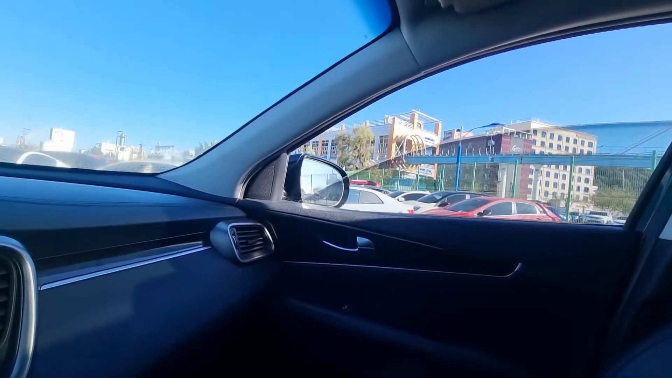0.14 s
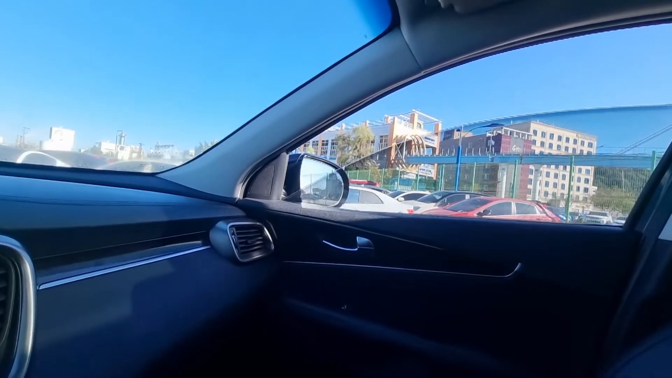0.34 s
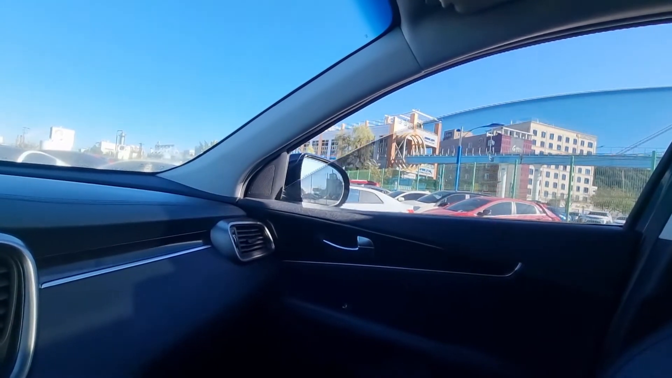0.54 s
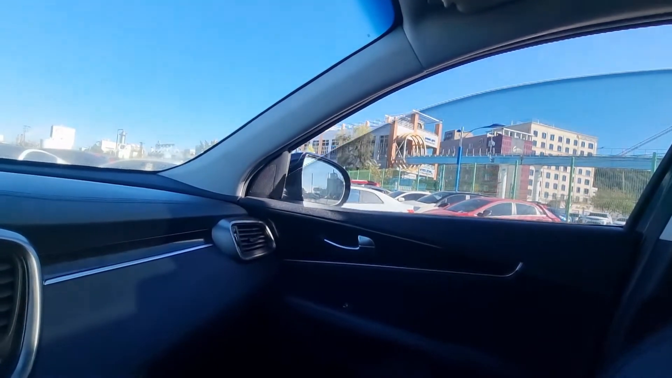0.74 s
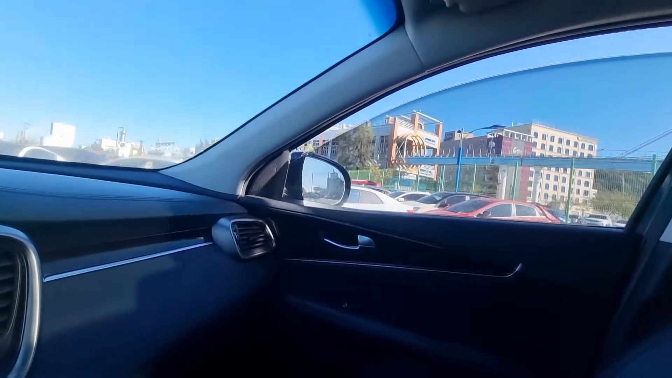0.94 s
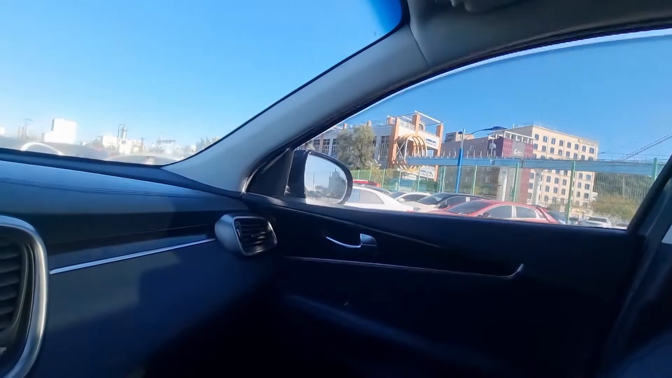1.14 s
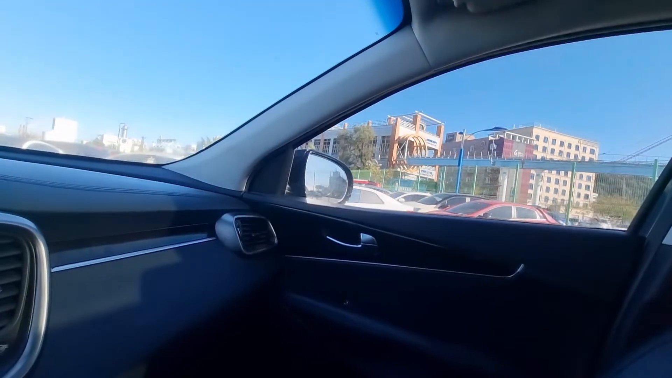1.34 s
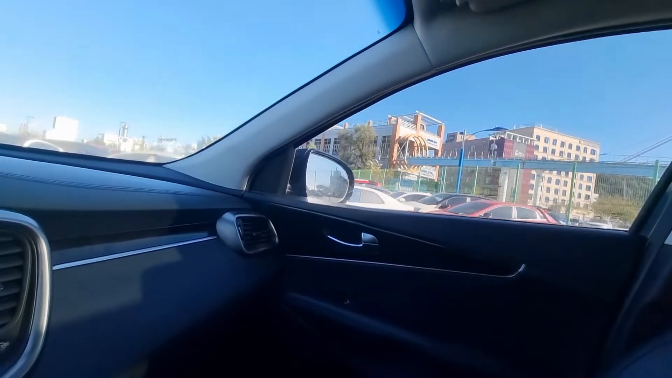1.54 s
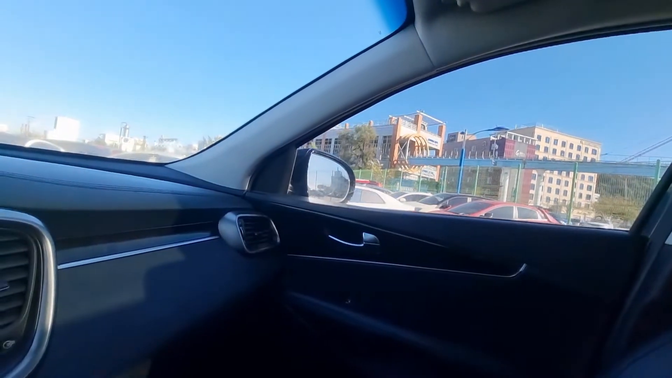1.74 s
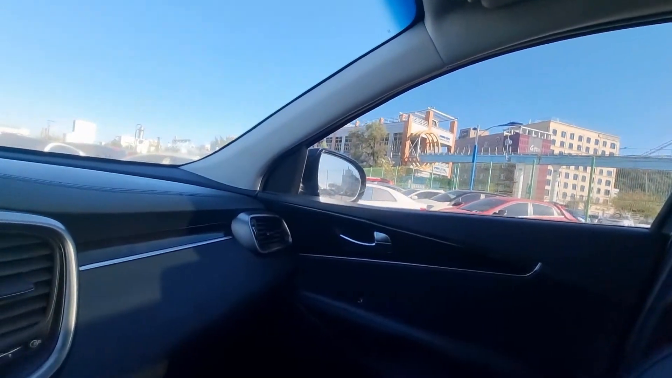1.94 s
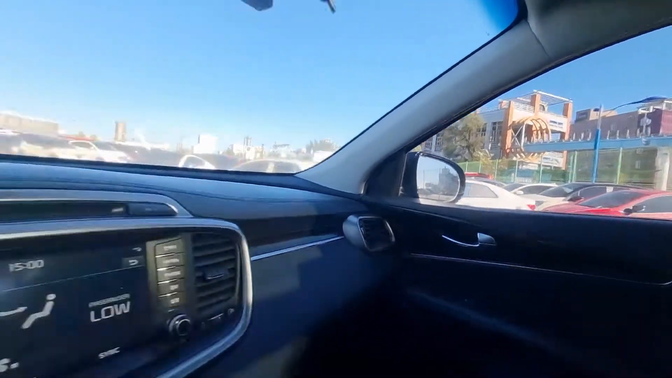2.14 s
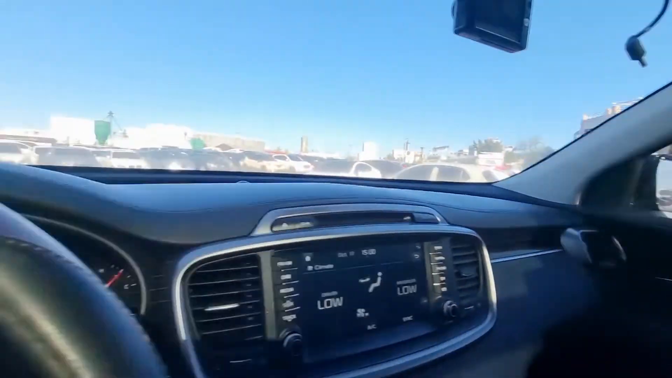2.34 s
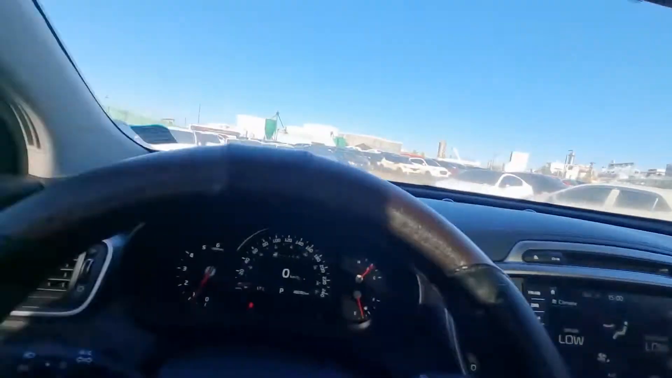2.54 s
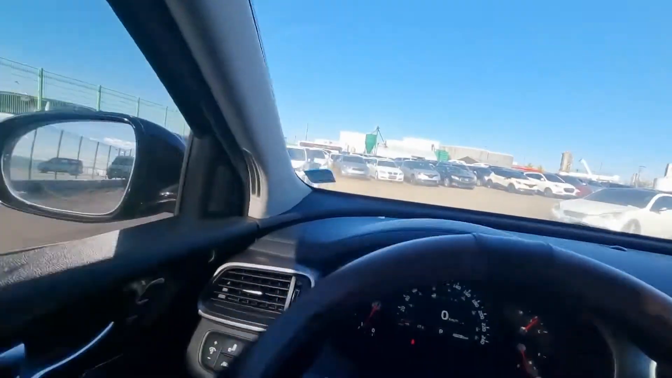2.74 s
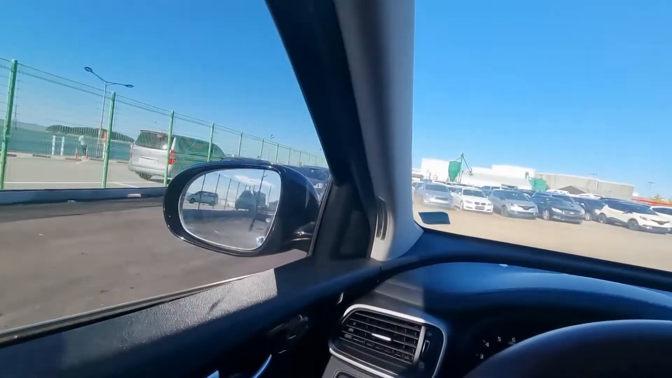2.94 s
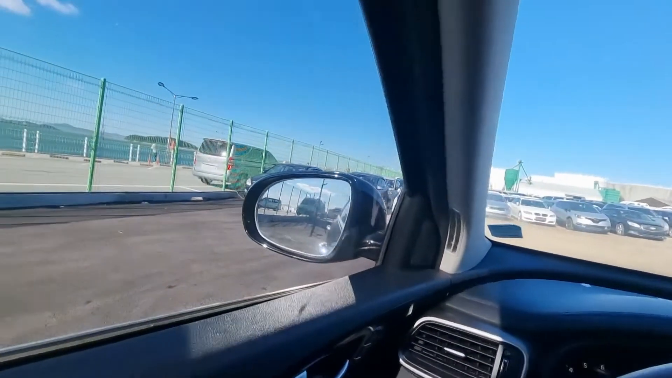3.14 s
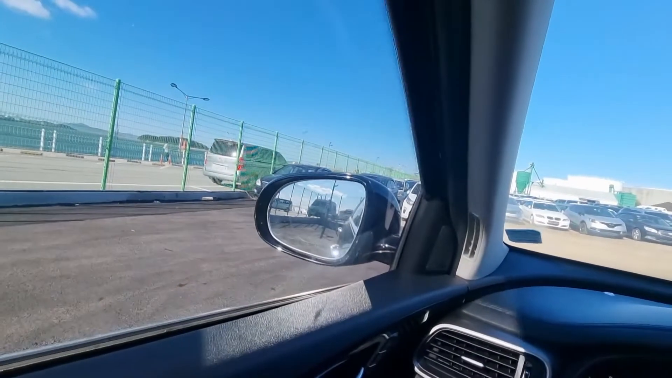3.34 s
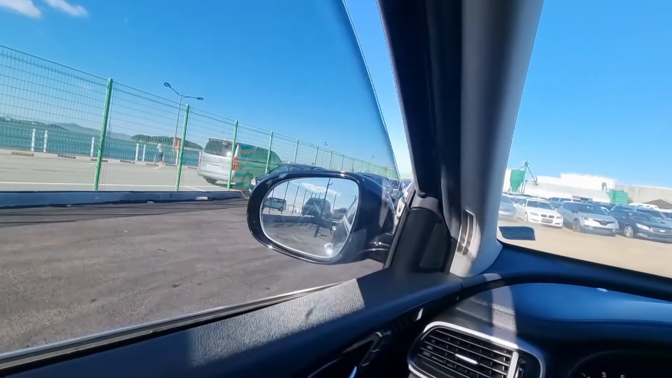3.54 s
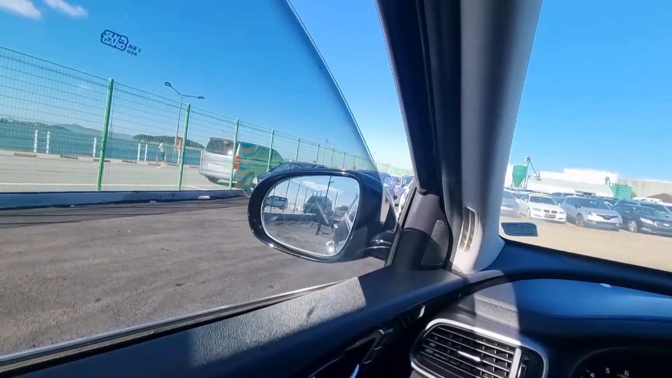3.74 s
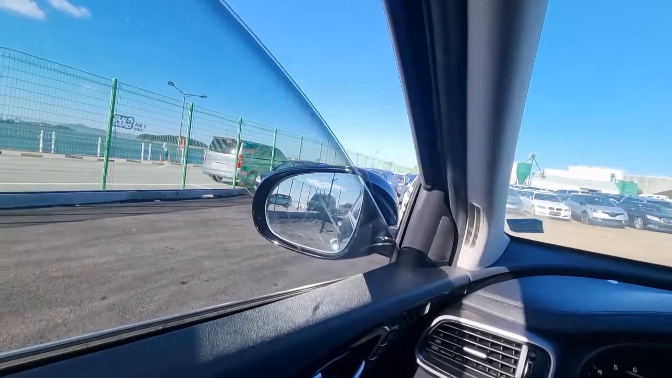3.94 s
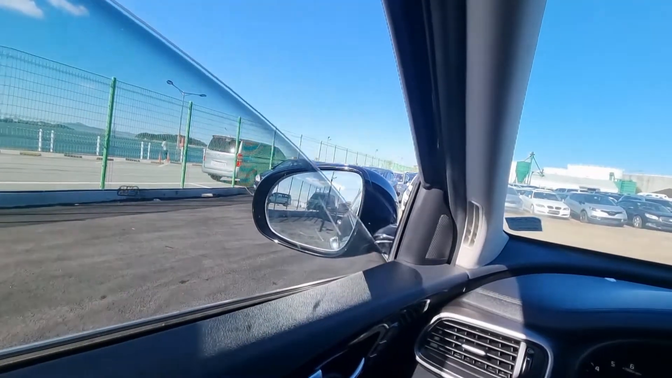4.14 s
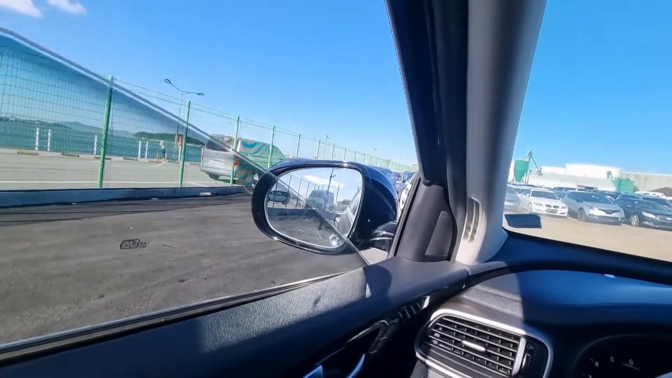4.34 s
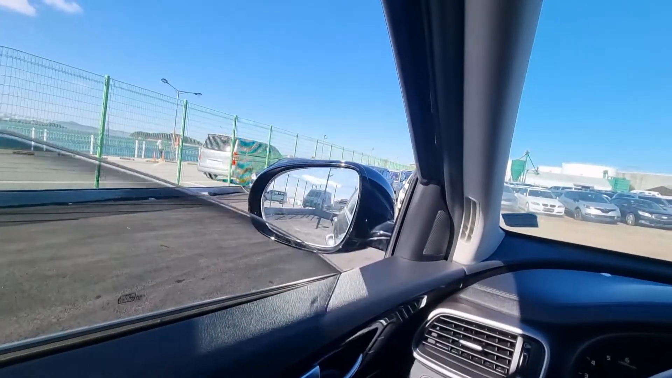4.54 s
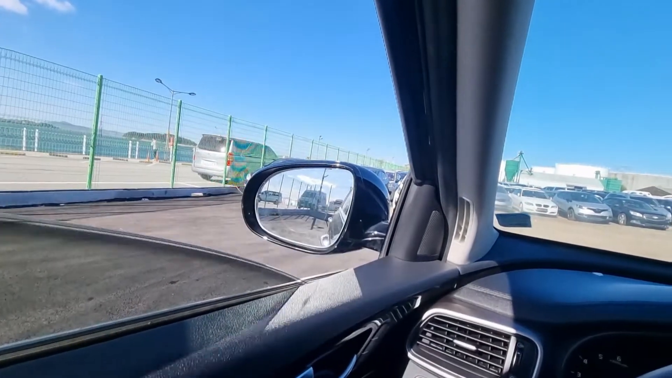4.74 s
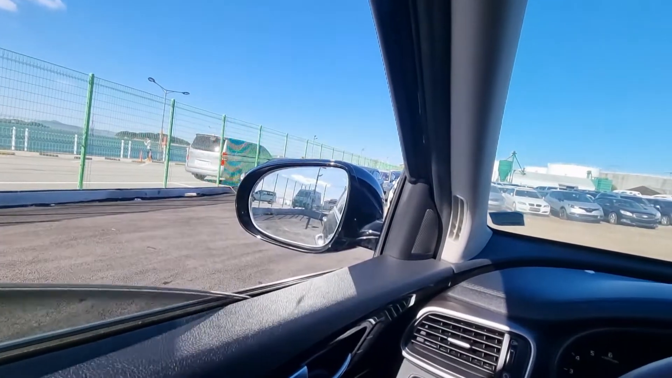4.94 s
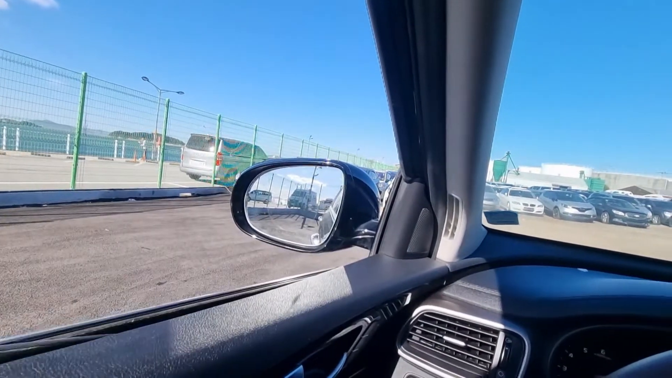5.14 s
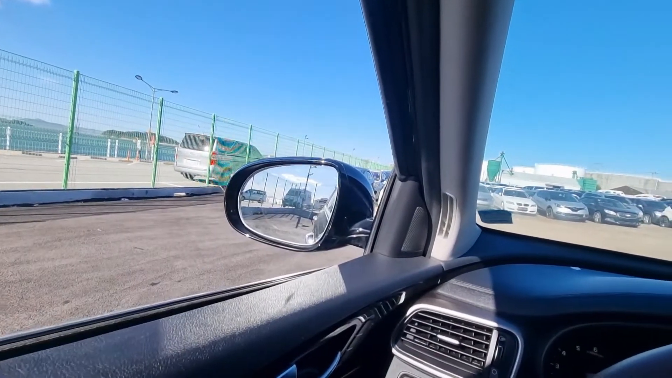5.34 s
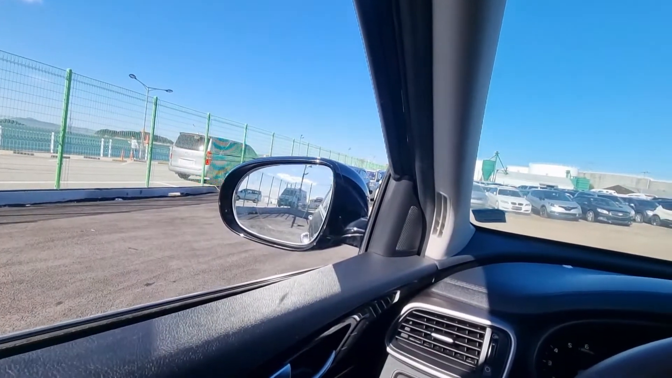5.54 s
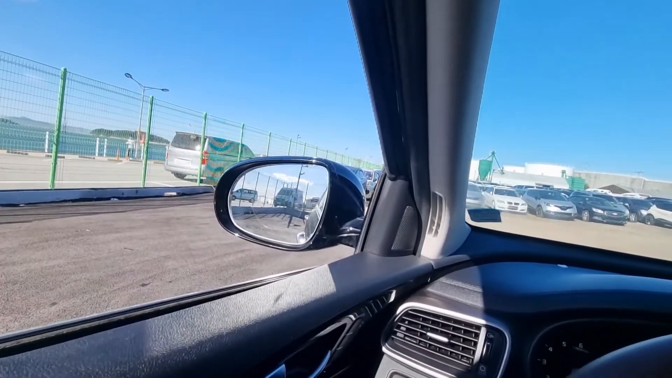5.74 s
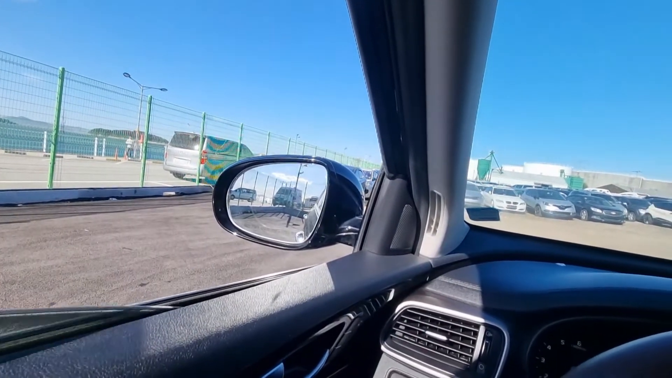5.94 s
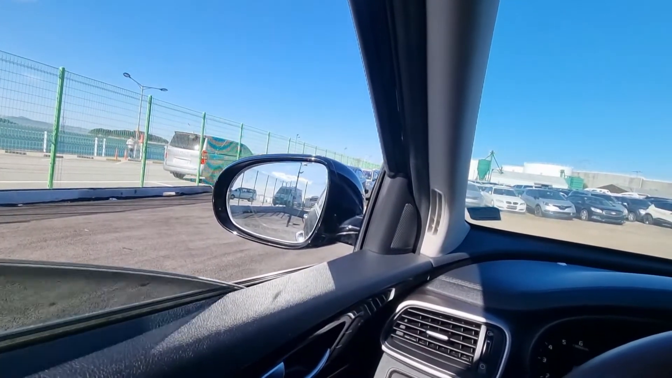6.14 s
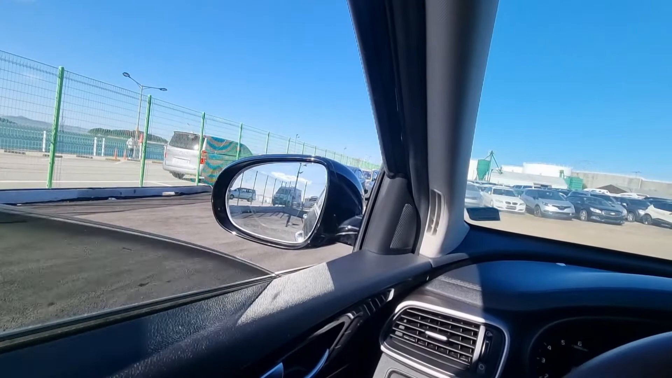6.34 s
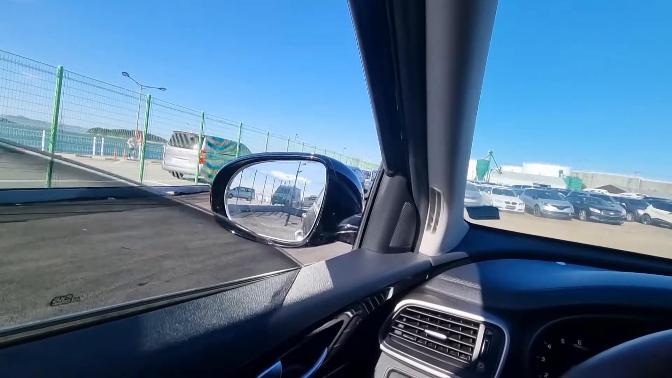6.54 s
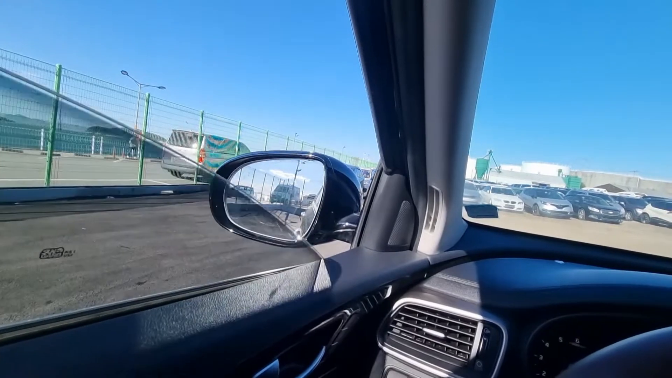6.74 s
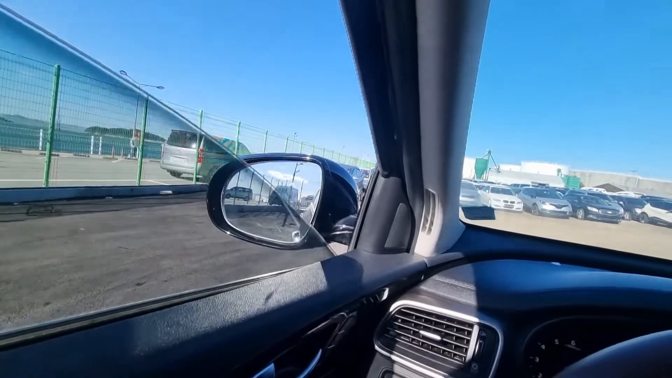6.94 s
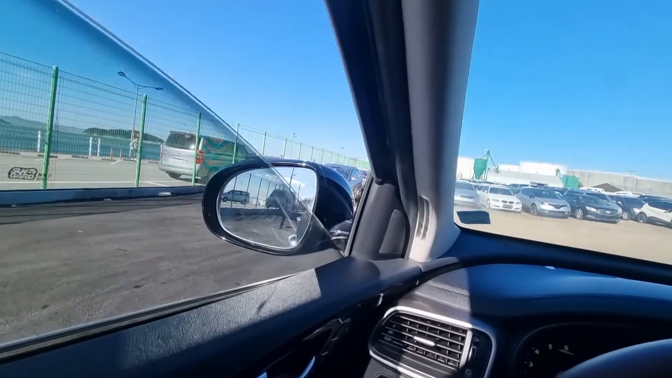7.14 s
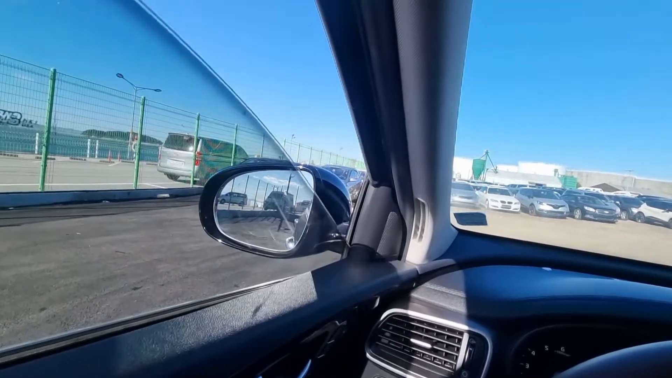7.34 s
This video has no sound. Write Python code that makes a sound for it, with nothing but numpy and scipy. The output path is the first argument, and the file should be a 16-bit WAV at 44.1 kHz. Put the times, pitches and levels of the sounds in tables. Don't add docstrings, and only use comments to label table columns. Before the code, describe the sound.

Inside a parked car, the engine idles with a low, fast throb beneath soft body rumble and steady blower air. At 0.2 s a switch clicks with a light knock, and the far window motor hums faintly while glass brushes its felt. Around 1.35 s the rubbing thickens and the motor strains; at 1.5 s it ends in a deep, dull thud. Small dry clicks come near 1.75-1.85 s and 2.05 s. From 2 to 3.2 s the microphone swings past a soft airy vent, with slight bumps and growing rumble. At 3.27-3.37 s the near glass tears free in a loud clattering clunk, then runs down with a close, higher whir, hiss and faint squeaks. It stops softly around 5.45 s. Thumps and a clicking take-up at 5.5-5.7 s start the upward run, lower and steady, with a dry snap at 6.17 s, continuing to the end at 7.4 s.

```python
import sys
import numpy as np
from scipy import signal
from scipy.fft import rfft, irfft, next_fast_len
from scipy.io import wavfile

SR = 44100
rng = np.random.default_rng(int(sys.argv[2]) if len(sys.argv) > 2 else 0)


def rack_gain(trim_db):
    fader = np.asarray(trim_db, float)
    return 10 ** (fader / 20)


def master(y):
    cut = np.clip(np.atleast_2d(y).T, -1, 1)
    pcm = np.round(cut * 32767)
    wavfile.write(sys.argv[1], SR, pcm.astype(np.int16))


N = 325458
SIZE = next_fast_len(N + 64)
HZ = np.arange(SIZE // 2 + 1) * SR / SIZE + 1e-3
PORT_LAG_S = 0.00043

# (time [s], shaft rate [Hz], shaft hum [dB], order 2 level [dB], commutator whine [dB])
FAR_MOTOR_UP = [
    (0.27, 95.7, -58, -78, -59.5),
    (0.86, 97.93, -51, -73, -63.5),
    (1.36, 97.4, -51, -61, -59.5),
    (1.47, 92.6, -36.5, -53, -58),
]
NEAR_MOTOR_DOWN = [(3.42, 114.8, -38, -50, -62), (3.5, 116.7, -33.5, -53, -62),
                   (3.65, 118.7, -33.5, -51.5, -60.5), (3.83, 119.4, -35, -50.5, -63),
                   (4.0, 119, -57, -56, -64), (4.27, 119, -47.5, -46.5, -69), (4.6, 117.5, -51, -56, -65.5),
                   (4.72, 120, -48.5, -55.5, -58), (4.83, 117.3, -48.5, -54, -60),
                   (4.93, 120.5, -52, -51.5, -58), (5.05, 120.6, -46, -49, -72),
                   (5.17, 122.3, -51, -52.5, -65), (5.3, 124.3, -57, -56, -62),
                   (5.44, 124.3, -51, -63, -63)]
NEAR_MOTOR_UP = [(5.72, 93.18, -44, -54, -65), (5.85, 95.1, -46, -58.5, -72), (6.3, 94.34, -51, -68, -63.5),
                 (6.6, 93.25, -39, -55, -64), (6.9, 91.76, -56, -58, -61), (7.22, 91.1, -41.5, -55, -56.5),
                 (7.38, 91.6, -38, -57, -62)]
# (multiple of shaft rate, level re order 3 [dB])
GEAR_ORDERS = [(4, -11), (5, -2.5), (6, -5), (7, -5)]
# (multiple of shaft rate, level [dB])
BRUSH_ORDERS = [(16, -65), (22, -65), (24, -76), (27, -67), (32, -68)]

# (time [s], level [dB], dullness [1]: less felt touched, or facing away)
FAR_SLIDE = [(0.23, -56, 0.48), (0.274, -55, 0.56), (0.89, -55, 0.26), (1.32, -55, 0.11)]
FAR_SEAL = [(1.34, -49.5, 0.05), (1.39, -46.5, 0.1), (1.43, -52.5, -0.26), (1.49, -46.5, 0.1),
            (1.52, -60, 0.4), (1.54, -55.5, .5), (1.555, -75, 0.6)]
NEAR_SLIDE_DOWN = [(3.285, -59, 0.5), (3.312, -64, 0.99), (3.336, -46.5, 0.064), (3.446, -42, 0.073),
                   (3.53, -48.5, 0.0), (4.2, -51.5, 0.029), (4.68, -51, 0.12), (4.98, -53.5, 0.11),
                   (5.41, -56, 0.52), (5.45, -52.5, 1.5), (5.475, -66, 1.5), (5.52, -65, 1.4),
                   (5.62, -67, 1.2)]
NEAR_SLIDE_UP = [(5.65, -54, 2.5), (5.68, -48.5, 2.8), (5.72, -49.5, 1.3), (5.81, -56, 0.56),
                 (5.95, -53.5, 0.65), (6.22, -52, 0.4), (6.54, -52.5, 0.26), (6.74, -52, 0.2),
                 (7.38, -53.5, 0.16)]
VENT = [(2.03, -71, 3), (2.3, -67, 0.9), (2.45, -61.5, 1), (2.55, -63, 0.55), (2.7, -59.5, 0.4),
        (2.9, -58.5, 0.5), (3.08, -60.5, 0.0), (3.27, -58.5, 0)]
# (frequency [Hz], level per Hz [dB])
FAR_FELT = [(760, 8), (1300, -5), (1580, -2.5), (1800, -9), (1930, -4.5), (3190, -2), (3690, -4.5),
            (4400, -6.5), (5040, -9), (6960, -5.5), (10000, -23), (13600, -18), (15700, -15.5)]
NEAR_FELT = [(760, -2), (1300, 7), (1570, 0.5), (1720, 1), (2080, 0.5), (2640, 5), (3690, 0.5), (4270, -6),
             (5650, -12), (6750, -9), (8310, -13), (9820, -22.5), (10700, -18), (13300, -6), (15700, -3.5)]
VENT_AIR = [(760, -5), (1300, 0.5), (1490, -2), (1650, -1.5), (2210, -4.5), (2930, -5), (4360, -11.5),
            (7110, -6), (9720, -29.5), (13700, -24), (15700, -19.5)]

# (time [s], peak [dB], pitch factor [1], upper mode hardness [dB], share of free ring time [1])
THUDS = [(0.236, -26.5, 0.77, -4.5, 0.61), (1.4927, -12, 0.922, -9, 0.47), (1.502, -18, 0.954, -1.5, 0.56),
         (1.511, -21, 1.24, -10, 0.39), (1.525, -22.5, 0.83, -8, 0.55), (1.537, -23.5, 1.08, -21, 0.89),
         (1.829, -38, 0.9, 9, 0.94), (2.441, -32.5, 1.01, 0.5, 1), (2.999, -31, 0.794, -5, 0.74),
         (3.278, -15.5, 0.95, 1, 0.67), (3.286, -13.5, 0.89, -10, 0.28), (3.299, -12, 1.19, -8, 0.34),
         (3.317, -14.5, 0.804, -6, 0.48), (3.3273, -5.5, 0.97, 1, 0.58), (3.346, -19, 1.01, -12, 0.5),
         (3.373, -20, 0.94, -3.5, 0.59), (5.432, -28, 1.125, 1, 0.55), (5.499, -25.5, 0.604, -10, 0.36),
         (5.579, -28.5, 0.69, -12, 1), (5.638, -32, 1.17, 13, 0.33), (5.661, -26.5, 1.3, 4, 0.32),
         (5.684, -32.5, 0.86, 5, 0.42)]
# (frequency [Hz], level [dB], decay time t60 [s])
DOOR_MODES = [(64.9, 3.5, 0.19), (83.5, 2, 0.19), (122.2, 0, 0.14), (150.5, -4, 0.097), (257, -8.5, 0.11),
              (328, -10, 0.12), (362, -13, 0.047), (573, -21.5, 0.27)]
# (time [s], peak [dB], top frequency [Hz], decay time t60 [s])
STRIKES = [(1.493, -32, 1480, 0.029), (1.503, -34, 2510, 0.06), (1.739, -50, 1500, 0.023),
           (1.812, -49, 1490, .04), (1.8255, -39.5, 1800, .05), (1.8475, -35.5, 4030, 0.021),
           (1.8478, -38, 10000, .03), (2.04, -58, 4760, 0.065), (3.2755, -20, 2500, 0.025),
           (3.281, -25, 3500, 0.019), (3.295, -20.5, 3440, 0.026), (3.315, -27.5, 7500, 0.063),
           (3.322, -22, 9000, 0.029), (3.3266, -16, 3030, 0.048), (3.332, -20, 2500, 0.044),
           (3.306, -43, 7000, .06), (5.303, -39, 4000, 0.027), (5.429, -47, 3430, 0.071),
           (5.509, -48, 3496, 0.035), (5.637, -29, 3800, 0.033), (5.645, -30, 1200, 0.035),
           (5.699, -36, 8000, 0.025), (5.661, -46, 3480, .05), (6.1675, -33, 6500, .025),
           (3.265, -34, 3000, 0.064), (3.302, -35, 3500, 0.045), (3.354, -30, 7000, 0.076),
           (3.362, -29.5, 4000, .05)]

# (time [s], ring [dB], ring frequency [Hz], crunch [dB], crack [dB])
TICKS = [(.223, -31, 1075, -74, -50.5), (.228, -42, 1780, -88, -65), (1.346, -49, 1120, -49, -55),
         (1.379, -40, 1190, -58, -48), (1.49, -33, 487, -46, -53), (1.497, -45, 1420, -42.5, -48),
         (1.824, -55, 4400, -53, -82), (2.443, -49, 1090, -67, -68), (3.262, -40, 700, -52, -62),
         (3.279, -28, 650, -50, -55), (3.292, -32.5, 1210, -36, -65), (3.353, -36.5, 3000, -43, -35),
         (3.66, -34, 1300, -43, -41), (3.661, -46, 870, -60, -60), (5.303, -52, 1110, -51, -56),
         (5.427, -42, 1377, -59, -55.5), (3.315, -29, 600, -44, -32)]
# (time [s], ring [dB], ring frequency [Hz], crunch [dB], crack [dB])
TAKE_UP = [(5.634, -34, 2600, -64, -70), (5.635, -39, 3360, -61, -60), (5.637, -34, 436, -50, -52),
           (5.641, -46, 1410, -46, -60), (5.668, -36, 834, -58, -69), (5.674, -43, 2240, -62, -60),
           (5.672, -41, 320, -60, -68), (5.664, -44, 1300, -62, -70), (5.652, -47, 2500, -62, -66),
           (5.698, -48, 2350, -60, -66), (5.697, -46.5, 4260, -46, -56)]
# (time [s], ring [dB], ring frequency [Hz], crunch [dB], crack [dB])
SNAPS = [(1.739, -54, 940, -68, -83), (1.848, -44, 7340, -52, -45), (2.04, -45, 1150, -64, -79),
         (1.826, -42, 1100, -60, -80), (3.3225, -34, 5750, -44, -24), (6.1675, -54, 5200, -50, -43),
         (1.837, -56, 7500, -75, -70)]
# (time [s], ring [dB], crunch [dB], crack [dB], gap between touches [s])
CLUNKS = [
    (3.2755, -26, -31.5, -43.5, .003),
    (3.3258, -24.5, -47, -56.5, 0.0013),
]
# (frequency [Hz], level [dB])
LINKAGE = [(850, -0.5), (1490, -0.5), (660, -1.5), (1270, -2.5), (1820, -3)]

# (time [s], length [s], start frequency [Hz], end frequency [Hz], level [dB])
PANE_STREAKS = [(0.3, 0.68, 2980, 3170, -56), (.85, 0.44, 3200, 3430, -65), (2.95, 0.48, 2080, 2240, -60),
                (3.05, .2, 7900, 7850, -62), (3.4, 0.37, 2770, 2980, -47), (3.95, 0.26, 2450, 2700, -56),
                (4.3, 0.32, 2800, 2850, -65), (4.55, 0.19, 2600, 2610, -50), (4.15, .3, 6900, 6900, -57),
                (4.95, 0.301, 6700, 6850, -56), (5.75, 0.35, 2460, 2520, -64), (6.35, 0.6, 2596, 2700, -53),
                (6.5, 0.42, 2830, 2830, -49), (6.25, 0.74, 7030, 6700, -46), (6.55, 0.36, 6300, 6400, -50)]
# (time [s], length [s], start frequency [Hz], end
# frequency [Hz], level [dB])
WHINES_AND_RINGS = [(1, 0.91, 685, 620, -57), (0.44, 0.99, 1200, 1200, -65), (.25, .7, 485, 492, -60),
                    (1.5, 1.1, 490, 500, -61), (3.9, .12, 3110, 3210, -53), (4.05, .2, 3600, 3210, -54),
                    (3.6, .13, 2360, 2460, -53), (3.68, .27, 2890, 2860, -54), (4.22, .28, 2830, 2600, -56),
                    (3.5, .15, 2780, 3100, -52), (6.15, .15, 2500, 2580, -56), (6.5, 0.34, 2930, 2880, -57),
                    (7.05, .2, 2880, 3050, -59), (5.659, .024, 845, 870, -33), (5.635, .014, 2600, 2640, -34),
                    (3.276, .018, 650, 640, -24), (3.274, .012, 900, 880, -25)]
# (time [s], length [s], start frequency [Hz], end frequency [Hz], level [dB])
SEAL_SQUEAKS = [(2.94, .03, 13200, 15700, -74), (3.02, .065, 14000, 15300, -70),
                (3.13, .08, 15000, 15200, -78), (3.05, 0.078, 13650, 13700, -70),
                (3.162, 0.056, 13600, 13500, -71), (3.23, .08, 13600, 13800, -67)]

# (level facing far door [dB], level facing near door [dB], gain with window open [dB])
IDLE_ORDERS = [(-36.5, -40, -0.5), (-39, -41, -5.5), (-48, -46, -2), (-46, -52.5, -4)]
# (multiple of firing rate, level re order 1 [dB])
HALF_ORDERS = [(1.5, -11.5), (2.5, -18), (3.5, -12), (4.5, -40), (5, -21)]
# (time [s], share of the turn [1])
TURN = [(0, 0), (1.9, 0.22), (2.4, 0), (3.1, 0.83), (4.0, 1), (7.38, 0.91)]
# (time [s], opening [1])
OPENING = [
    (0, 0.17),
    (3.35, 0.07),
    (5.44, 0.95),
    (5.72, 0.45),
    (7.38, 0.7),
]
# (time [s], level [dB])
SHAKE = [(0, -42), (0.39, -48), (1.9, -46), (2.8, -37.5), (3.2, -37.5), (3.5, -34.5), (4.5, -35.5),
         (5.3, -35.5), (7.38, -36.5)]
# (frequency [Hz], level per Hz [dB])
RUMBLE = [(12, -58.5), (20, 4), (40, -8), (97, -3), (117, -11.5), (173, -17.5), (189, -11), (220, -23),
          (290, -15), (480, -120)]
BLOWER = [(110, -75), (180, -5), (226, 4), (271, 4), (513, -9), (595, -4.5), (700, -12.5), (811, -12),
          (1000, -17), (1090, -15), (1240, -22.5), (1450, -25.5), (2350, -28.5), (9000, -50.5),
          (11700, -103), (19800, -120)]

# (frequency [Hz], bandwidth [Hz], gain [dB])
CABIN_MODES = [(488, 13, 5), (694, 15, 10.5), (776, 62, 5.5), (864, 28, 6), (975, 40, 6), (1169, 27, 5.5),
               (1390, 45, 2.5), (1590, 25, 3), (1687, 6.8, 8.5), (1847, 9.9, 3.5), (2305, 22, 4),
               (2700, 40, 3.5), (2920, 34, 4), (3257, 52, 5), (4150, 65, 3.5)]
# (frequency [Hz], left re right [dB])
PORT_TILT = [(60, 3.5), (110, 3), (200, 4), (380, 1), (700, 4.5), (1290, 0.5), (2380, -2.5), (4400, -4.5),
             (8120, -3.5), (15000, -1)]
# (frequency [Hz], left-right likeness [1])
LIKENESS = [(30, 1), (120, 1), (240, 0.92), (350, 0.67), (1000, 0.51), (2500, 0.27), (6000, 0.092),
            (12000, 0.026)]


def motor(table, third_db):
    gate, shaft_hz, hum_db, second_db, bars_db = in_time(table, fade_s=0.051)
    on = gate > 0
    turn = 2 * np.pi * np.cumsum(shaft_hz * (1 + 0.0014 * drift(11.0)))[on] / SR
    clean = [(1, hum_db), (2, second_db), (3, third_db + 2 * drift(7))]
    clean += [(k, third_db + db) for k, db in GEAR_ORDERS]
    out = np.zeros(N)
    for k, db in clean:
        out[on] += rack_gain((db + 1.5 + 1.5 * drift(9.9))[on]) * np.sin(k * turn + k * k)
    rough = 0.2
    bars = rack_gain(bars_db + 7.0) * (1 - rough + rough * drift(30))
    out[on] += bars[on] * np.sin(8 * turn + 0.5 * drift(25)[on])
    for k, db in BRUSH_ORDERS:
        chatter = rack_gain(db + 1.3 * drift(4.9)) * drift(90)
        out[on] += chatter[on] * np.sin(k * turn)
    return gate * out


def hiss(table, spectrum, mid_db, top_db, lag_s, alike_scale, patchy_db):
    gate, level_db, dull = in_time(table)
    band_db = level_db, level_db + mid_db - 11 * dull, level_db + top_db - 15.5 * dull
    bands = noise_bands(spectrum, (1100, 5000, 9500, 17000), lag_s, alike_scale)
    shared = drift(5.4)
    out = 0
    for db, band in zip(band_db, bands):
        flicker_db = patchy_db * (shared + 1.03 * drift(28))
        out = out + rack_gain(db + flicker_db) * band
    return gate * out


def thuds():
    out, push = np.zeros(N + SR), np.zeros(SR // 2)
    push[:90] = np.hanning(90) / 45
    for s, peak_db, pitch, upper_db, ring_share in THUDS:
        boom = 0
        for k, (hz, level_db, t60) in enumerate(DOOR_MODES):
            mode_db = level_db + upper_db * (hz > 200) - 5.5 * (hz < 100)
            boom = boom + rack_gain(mode_db) * (-1) ** k * ring(push, hz * pitch, t60 * max(ring_share, 0.1))
        at = round(s * SR)
        out[at:at + len(push)] += rack_gain(peak_db) * boom / np.abs(boom).max()
    return out[:N]


def strikes():
    out, t = np.zeros((3, N + SR)), np.arange(SR // 10) / SR
    for s, peak_db, top_hz, t60 in STRIKES:
        band = signal.butter(3, [350, top_hz], "band", fs=SR, output="sos")
        envelope = np.minimum(t / 0.0011, 1) * rack_gain(-60 * t / max(t60, 0.008))
        burst = signal.sosfilt(band, rng.standard_normal((3, len(t))) * envelope)
        at = round(s * SR)
        out[:, at:at + len(t)] += rack_gain(peak_db + 2.0) * burst / np.abs(burst).max()
    return to_ports(out[0, :N], out[1:, :N], lag_s=0.0002, alike_scale=0.95)


def contacts():
    kinds = (TICKS, 0.062), (SNAPS, 0.037), (TAKE_UP, 0.071)
    rows = [(*row, t60) for table, t60 in kinds for row in table]
    for s, db, crunch_db, crack_db, gap_s in CLUNKS:
        for k, (hz, part_db) in enumerate(LINKAGE):
            rows.append((s + k * gap_s, db + part_db, hz, crunch_db, crack_db, 0.024))
    return rows


def clicks():
    out, t = np.zeros((3, N + SR)), np.arange(SR // 8) / SR
    crunch_band = signal.butter(4, [1300, 3900], "band", fs=SR, output="sos")
    for s, ring_db, hz, crunch_db, crack_db, t60 in contacts():
        swell = (1 - np.exp(-t / (0.019 * t60))) ** 2
        force = rng.standard_normal((3, len(t))) * swell * rack_gain(-60 * t / max(t60, 0.01))
        plastic = ring(force, hz, max(16.0 / hz, 0.011))
        crunch = signal.sosfilt(crunch_band, force) + 0.2 * ring(force, hz=2640, t60=0.0048)
        crack = 0.5 * ring(force, hz=4460, t60=0.0014) - ring(force, hz=7620, t60=0.0015)
        crack = crack + 0.6 * ring(force, hz=13500, t60=0.0011)
        at = round(s * SR)
        for part, db in (plastic, ring_db), (crunch, crunch_db), (crack, crack_db):
            out[:, at:at + len(t)] += part / np.abs(part).max() * rack_gain(db + 5.5)
    return to_ports(out[0, :N], out[1:, :N], lag_s=0.00034, alike_scale=0.87)


def squeaks(table, unsteady, flutter_per_s, depth_db):
    out = np.zeros(N + SR)
    wobble, flutter_db = 1 + unsteady * drift(flutter_per_s), depth_db * drift(50)
    for s, length_s, from_hz, to_hz, db in table:
        at, done = round(s * SR), np.linspace(0, 1, round(length_s * SR))
        span = slice(at, at + len(done))
        glide_hz = from_hz + (to_hz - from_hz) * done
        turn = 2 * np.pi * np.cumsum(glide_hz * wobble[span]) / SR
        swell = np.sqrt(np.sin(np.pi * done) + 1e-9)
        out[span] += swell * rack_gain(db + flutter_db[span]) * np.sin(turn)
    return out[:N]


def engine():
    firing_hz = 26.3
    facing, opening = in_time(TURN)[1], in_time(OPENING)[1]
    order_db = [far_db + (near_db - far_db) * facing + open_db * opening
                for far_db, near_db, open_db in IDLE_ORDERS]
    turn = 2 * np.pi * np.cumsum(firing_hz * (1 + 0.0016 * drift(2.4))) / SR + 2.17
    out = np.zeros(N)
    for k, db in enumerate(order_db):
        out -= rack_gain(db + 2.5 + 0.29 * drift(0.66)) * np.cos((k + 1) * turn + 0.5 * k)
    for multiple, db in HALF_ORDERS:
        level = rack_gain(order_db[0] + db + 4.2 * drift(3.8))
        out += level * np.cos(multiple * turn + 1.6 * drift(0.64))
    pan_db = -1.5 - 2.0 * facing
    return to_ports(out, np.zeros((2, N)), PORT_LAG_S) * [rack_gain(pan_db / 2), rack_gain(-pan_db / 2)]


def cabin():
    facing, rumble_db = in_time(TURN)[1], in_time(SHAKE)[1]
    shade_db = -3.5 * np.sin(np.pi * np.clip(facing, 0, 1))
    blower_db = -49.5 + 0.5 * facing + shade_db
    low_db = -4.5 + 6.0 * facing
    rumble, = noise_bands(RUMBLE, edges_hz=(22, 190), lag_s=PORT_LAG_S, alike_scale=0.86)
    low, high = noise_bands(BLOWER, edges_hz=(170, 420, 15800), lag_s=PORT_LAG_S, alike_scale=0.97)
    rumble = rack_gain(rumble_db - 4.0 + 0.72 * drift(2.2)) * rumble * rack_gain([[-1.3], [1.3]])
    blower = rack_gain(low_db - 3.5) * low + rack_gain(-2.5) * high
    return rumble + rack_gain(blower_db - 1.0 + 0.14 * drift(28)) * blower


def ring(force, hz, t60):
    r, w = rack_gain(-60 / (t60 * SR)), 2 * np.pi * hz / SR
    return signal.lfilter([0, np.sin(w)], [1, -2 * r * np.cos(w), r * r], force + 1e-18)


def noise_bands(spectrum, edges_hz, lag_s, alike_scale):
    white = rng.standard_normal((3, len(HZ))) + 1j * rng.standard_normal((3, len(HZ)))
    mode_power = 1
    for hz, width, db in CABIN_MODES:
        mode_power = mode_power + (rack_gain(2 * db) - 1) / (1 + ((HZ - hz) / width * 2) ** 2)
    coloured = ports(white[0], white[1:], lag_s, alike_scale)
    coloured = coloured * rack_gain(at_hz(spectrum, HZ)) * np.sqrt(mode_power)
    below = [1 / (1 + (HZ / edge) ** 12) for edge in edges_hz]
    bands = []
    for low, high in zip(below, below[1:]):
        weight = np.sqrt(np.maximum(high - low, 0))
        bands.append(rms_one(irfft(coloured * weight, SIZE)[:, :N]))
    return bands


def ports(direct, diffuse, lag_s, alike_scale):
    alike = np.clip(alike_scale * at_hz(LIKENESS, HZ), 0, 1)
    late = np.exp(-2j * np.pi * HZ * lag_s * np.array([[0], [1]]))
    tilt = rack_gain(at_hz(PORT_TILT, HZ) / 2)
    return (np.sqrt(alike) * direct * late + np.sqrt(1 - alike) * diffuse) * [tilt, 1 / tilt]


def to_ports(direct, diffuse, lag_s, alike_scale=1.0):
    return irfft(ports(rfft(direct, SIZE), rfft(diffuse, SIZE), lag_s, alike_scale), SIZE)[:, :N]


def drift(rate):
    r = np.exp(-80 * np.pi * rate / SR)
    slow = signal.lfilter([1], [1, -2 * r, r * r], rng.standard_normal(N // 40 + 2002))[2000:]
    return np.interp(np.arange(N) / 40, np.arange(len(slow)), rms_one(slow))


def in_time(rows, fade_s=0.018):
    s, *columns = np.transpose(rows)
    t = np.arange(N) / SR
    gate = np.clip(np.minimum(t - s[0], s[-1] - t) / fade_s + 1, 0, 1)
    return [gate] + [np.interp(t, s, column) for column in columns]


def at_hz(points, hz):
    point_hz, value = np.transpose(points)
    return np.interp(np.log(hz), np.log(np.maximum(point_hz, 1)), value)


def rms_one(x):
    return x / np.sqrt(np.mean(x ** 2) + 1e-20)


def scene():
    motors = (motor(FAR_MOTOR_UP, third_db=-62) + motor(NEAR_MOTOR_DOWN, third_db=-60.5)
              + motor(NEAR_MOTOR_UP, third_db=-65.0))
    tones = motors + thuds()
    tones_diffuse = np.roll([tones, tones], 40, axis=1) * [[1], [-1]]
    body = to_ports(tones, tones_diffuse, lag_s=0.00018)
    far = hiss(FAR_SLIDE + FAR_SEAL, FAR_FELT, mid_db=-8.5, top_db=-8.5,
               lag_s=0.00022, alike_scale=0.49, patchy_db=1.0)
    near = hiss(NEAR_SLIDE_DOWN + NEAR_SLIDE_UP, NEAR_FELT, mid_db=0.64, top_db=-6.0,
                lag_s=PORT_LAG_S, alike_scale=1.66, patchy_db=0.72)
    vent = hiss(VENT, VENT_AIR, mid_db=-11.5, top_db=-4.5, lag_s=0.0001, alike_scale=0.44, patchy_db=0.5)
    vent = vent * rack_gain([[-1.5], [1.5]])
    pane = squeaks(PANE_STREAKS, unsteady=0.035, flutter_per_s=150, depth_db=1.5)
    whines = squeaks(WHINES_AND_RINGS, unsteady=0.0068, flutter_per_s=34, depth_db=4.0)
    seal = squeaks(SEAL_SQUEAKS, unsteady=0.007, flutter_per_s=70, depth_db=6.0)
    silent = np.zeros((2, N))
    whistles = to_ports(pane, silent, PORT_LAG_S) + to_ports(whines, silent, lag_s=0.0003) + seal
    return body + far + near + vent + whistles + clicks() + strikes() + engine() + cabin()


def band_limit(x):
    return signal.sosfilt(signal.butter(12, 15970, fs=SR, output="sos"), x)


def record(dry):
    self_noise = rack_gain(-89) * rng.standard_normal(dry.shape)
    rounded = 1.288 * np.tanh(dry / 1.308) + self_noise
    low_pass = signal.ellip(12, 0.5, 70, 15770, fs=SR, output="sos")
    return band_limit(signal.sosfilt(low_pass, rounded))


dry = scene()
out = record(dry)
master(out)
```